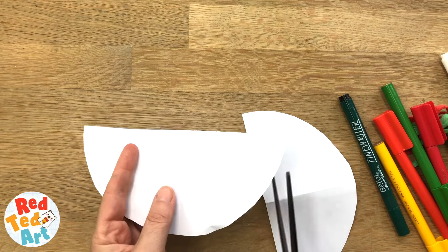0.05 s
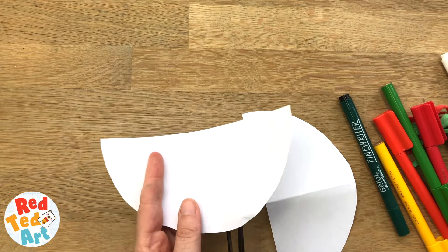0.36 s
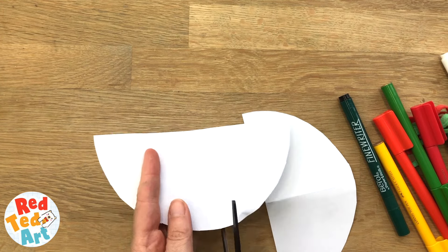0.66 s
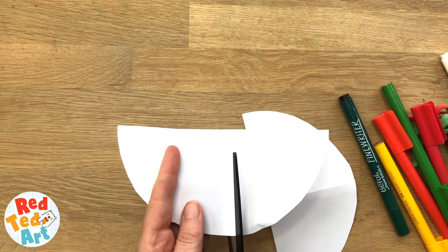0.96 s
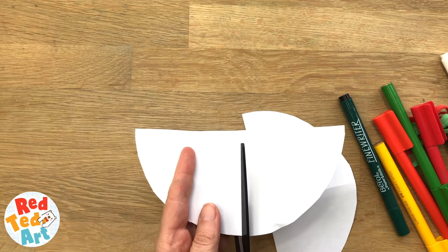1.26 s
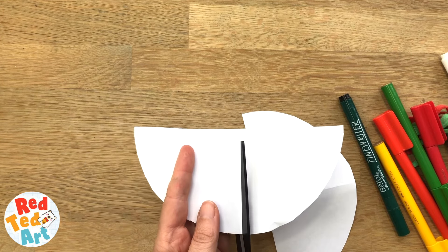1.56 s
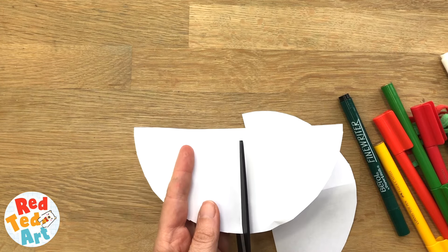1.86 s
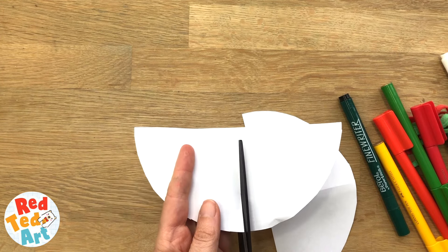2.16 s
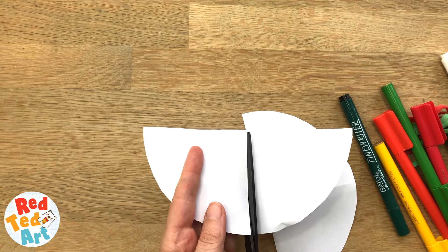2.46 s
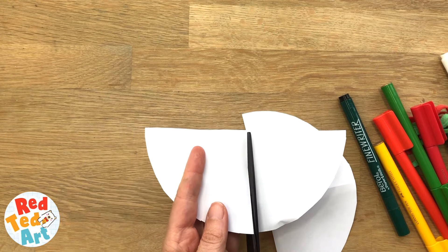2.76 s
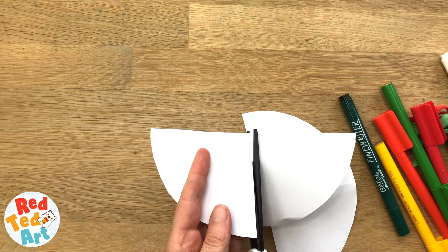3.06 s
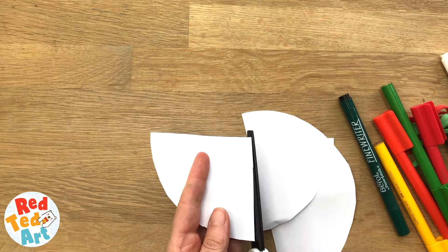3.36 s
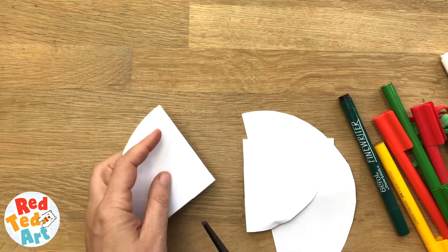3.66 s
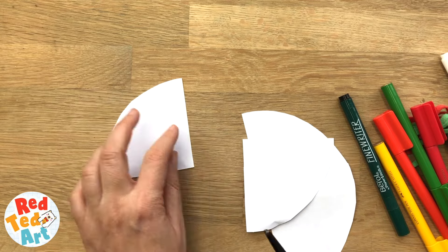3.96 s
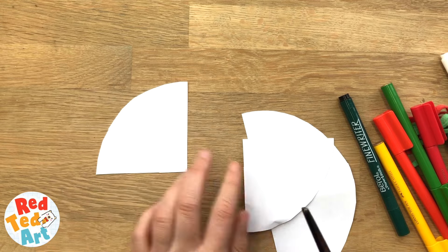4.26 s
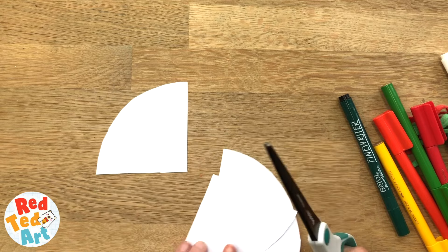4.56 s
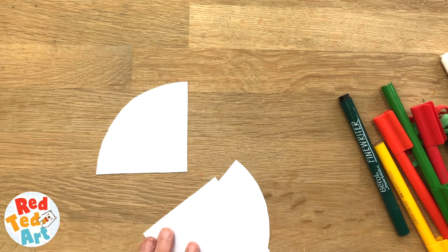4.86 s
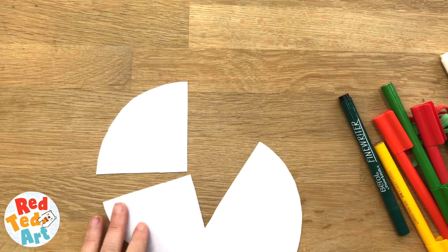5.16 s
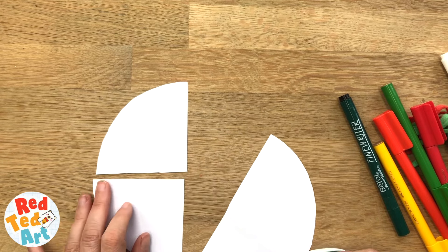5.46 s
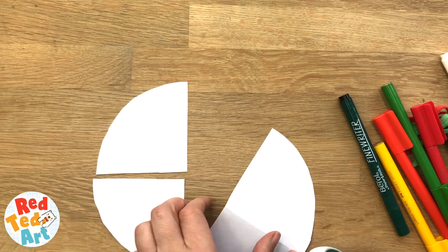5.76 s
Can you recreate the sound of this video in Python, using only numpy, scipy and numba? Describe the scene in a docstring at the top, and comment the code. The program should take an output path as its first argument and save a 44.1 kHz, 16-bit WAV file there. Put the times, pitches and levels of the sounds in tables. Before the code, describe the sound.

For the first 0.7 seconds a sheet of paper rustles and buckles with several sharp snaps, with a soft bump on a wooden table at 0.5. Around 1 second scissors begin cutting with a quiet, grainy crunch. After a short lull, slow crackling strokes follow from about 2 seconds, loudest near 2.8 and 3.3, and the blades shut with a sharp click just after 3.3. At 3.7 the paper snaps once more and a piece swishes over the wood. From about 4.5 to 5.7 come longer, bright sliding hisses, with tiny ticks of paper edges and a few soft, dull bumps. At 5.8 the scissors are put down with a knock and a slight rattle, briefly ringing the tabletop. Hands brush the wood faintly along the way. Everything is close to the microphone, over the low, steady tone of a small room.

```python
"""Scissors cut a folded paper half-circle in two, just above a wooden table in a small room; one close mic.
First the sheet rustles and buckles with sharp snaps as it is lined up. From about 1 s the blades crunch
through its fibres in a few slow strokes, clicking shut at 3.3 s. Then the pieces hiss as they slide over
the wood, and at 5.8 s the scissors are put down with a knock that rings the table top.
Hands brush the wood softly along the way, over a low, steady room tone."""
import sys
import numpy as np
from scipy import signal
from scipy.fft import rfft, irfft
from scipy.io import wavfile
from scipy.ndimage import map_coordinates
from numba import njit

SR = 44100
rng = np.random.default_rng(int(sys.argv[2]) if len(sys.argv) > 2 else 0)


def log_audio(samples):
    """Write samples as a 16-bit WAV file to the path given in sys.argv[1]."""
    # one column per channel
    frames = np.atleast_2d(samples).T
    # limit to full scale, then quantise
    limited = np.clip(frames, -1, 1)
    pcm = np.round(limited * 32767).astype(np.int16)
    wavfile.write(sys.argv[1], SR, pcm)


N = 260631
TIME = np.arange(N) / SR
HZ = np.maximum(np.arange(N // 2 + 1) * SR / N, 1)
CATCH_S = 0.0016  # onset of every hand movement

# resonances of blades and sheet: (centre [Hz], width [Hz], lift [dB])
CUT_RESONANCES = [(850, 300, -2.5), (1555, 190, 6.5), (5250, 190, -6.5), (8760, 260, 2), (14200, 1100, 0.5)]
# the sheet buckling: (time [s], pop peak [dB], crack relative to the pop [dB])
SNAPS = [(0.0531, -7, -11), (0.2099, -0.5, -4.5), (0.3289, -10, -13), (0.491, -7, -4), (0.493, -14, -0.5),
         (0.5093, -13, -15), (0.5414, -2, -18), (1.1756, -24, -16), (3.2716, -7, -15), (3.694, -10, -11)]


def cutting(flap_hz=4700, wander=0.19, flap_db=-15):
    """The crossing blades break fibre after fibre; the freed flap of paper rings at a shifting pitch."""
    # blade strokes, the last ones drawing the blades out:
    # (start [s], swell [s], hold [s], fade [s], body [dB], treble [dB])
    strokes = [(0.975, 0.085, 0.025, .1, -39.5, -40.5), (1.11, 0.035, 0.031, 0.16, -35, -37),
               (1.75, 0.3, .05, 0.023, -35.5, -36.5), (2.125, 0.018, 0.064, 0.037, -34, -34.5),
               (2.411, 0.0078, 0.14, 0.052, -31.5, -35), (2.735, 0.04, 0.041, 0.034, -25.5, -27.5),
               (2.84, 0.0056, 0.019, 0.17, -47, -42), (3.066, 0.0047, 0.0089, 0.082, -33, -34.5),
               (3.085, .06, 0.021, 0.086, -27.5, -32.5), (3.248, 0.03, 0.028, 0.042, -25, -25.5),
               (3.35, .002, 0.013, 0.073, -45, -39), (3.39, 0.047, 0.044, 0.12, -42, -43),
               (3.573, 0.012, 0.073, 0.24, -42, -40)]
    grains = fibres(per_s=7000, spread_db=0.5, clump_db=2.5, clump_hz=101)
    ring_hz = np.clip(flap_hz * np.exp(wander * drift(2)), 500, 12000)
    flap = moving_high_pass(grains, np.tan(np.pi * ring_hz / SR), damping=.1)
    return paper_friction(strokes, grains + from_db(flap_db) * flap, CUT_RESONANCES)


def crackling(rise_s=0.00097, burst_s=0.0097, fall_s=0.002):
    """The sheet crackles in short, dense bursts as it is bent or cut."""
    # runs of bursts: (time [s], bursts [count], spacing [s], body [dB], treble [dB])
    runs = [(0.085, 1, .02, -25.5, -49), (0.325, 2, .013, -23.5, -35), (1.141, 2, 0.035, -30, -33.5),
            (2.034, 1, 0.021, -30.5, -41), (2.103, 4, 0.018, -31.5, -32), (2.23, 2, 0.031, -37, -33.5),
            (2.299, 2, 0.02, -35, -33.5), (2.841, 3, 0.0125, -26, -27.5), (2.886, 1, .02, -26.5, -27.5),
            (3.069, 1, .02, -30.5, -30), (3.219, 1, .02, -34.5, -41), (3.258, 1, .011, -19.5, -18),
            (3.675, 2, .013, -22, -30.5)]
    # the crackle's two bands: (frequency [Hz], level [dB])
    body_spectrum = [(100, -19), (400, -11), (650, -3), (900, 4.5), (1500, -2.5), (2000, 1.5), (2700, -5.5),
                     (4200, -53)]
    treble_spectrum = [(1800, -79), (2800, -5), (3800, 6), (5600, 7.5), (7500, -0.5), (11000, -4.5),
                       (15000, -6)]
    body_gain, treble_gain = np.zeros((2, N))
    t = TIME[:SR // 10]
    burst = np.minimum(t / rise_s, 1) * np.exp(-np.maximum(t - burst_s, 0) / fall_s)
    for s, count, spacing, body_db, treble_db in runs:
        for k in range(round(count)):
            add(body_gain, s + k * spacing, from_db(body_db) * burst)
            add(treble_gain, s + k * spacing, from_db(treble_db) * burst)
    grains = fibres(per_s=11000, spread_db=2.5, clump_db=1.0, clump_hz=225)
    body = body_gain * colour(grains, body_spectrum, CUT_RESONANCES)
    treble = treble_gain * colour(grains, treble_spectrum, CUT_RESONANCES)
    return body + treble


def blade_clicks():
    """The blades meet at the end of the cut and rattle as the scissors land."""
    # blade on blade: (time [s], peak [dB])
    contacts = [(3.3425, -7.5), (3.3453, -2.5), (3.3464, 0.5), (5.766, -19.5), (5.7696, -19), (5.801, -29),
                (5.875, -28)]
    # modes of the blades: (frequency [Hz], level [dB], t60 [s])
    modes = [(1970, -5, 0.0027), (3390, -3.5, 0.0067), (5250, 3.5, 0.00077), (9350, -2.5, 0.00068),
             (14300, -13, 0.003)]
    return strikes(contacts, modes)


def buckling(pop_lag_s=0.00028):
    """The sheet buckles with a sharp crack, then a pop of its whole surface."""
    # modes of the sheet: (frequency [Hz], level [dB], t60 [s])
    crack_modes = [(4600, 1.3, 0.0057), (5840, 5.3, 0.0033), (7900, 5, 0.00085)]
    pop_modes = [(1010, -5, 0.0049), (1496, 4.5, 0.0026), (1920, -0.5, 0.0041), (2600, -8, 0.0033)]
    out = np.zeros(N)
    for s, pop_db, crack_db in SNAPS:
        add(out, s, from_db(pop_db + crack_db) * ring(crack_modes))
        add(out, s + pop_lag_s, from_db(pop_db) * ring(pop_modes))
    return out


def rustling(shiver_body_db=-30, shiver_treble_db=-54, shiver_fade_s=0.037):
    """Paper rubs on paper with a fine grain, and shivers after each snap."""
    # the sheet lined up and picked up again:
    # (start [s], swell [s], hold [s], fade [s], body [dB], treble [dB])
    rubs = [(0.0, 0.0011, .28, 0.27, -44.5, -42.5), (0.056, 0.0029, 0.0052, 0.058, -24.5, -48),
            (0.327, 0.034, 0.023, 0.061, -37.5, -30.5), (0.431, 0.003, 0.014, 0.042, -36, -36.5),
            (0.49, 0.017, 0.13, .04, -45, -46), (0.664, 0.0033, 0.046, 0.015, -48.5, -37.5),
            (5.79, 0.048, 0.07, .05, -55, -49)]
    shivers = [(s, CATCH_S, 0, shiver_fade_s, pop_db + shiver_body_db, pop_db + shiver_treble_db)
               for s, pop_db, _ in SNAPS]
    grains = fibres(per_s=15000, spread_db=3.5, clump_db=3.0, clump_hz=89.5)
    return paper_friction(rubs + shivers, grains)


def edge_ticks():
    """Paper edges catch with tiny, bright ticks."""
    # edges catching: (time [s], peak [dB])
    catches = [(.89, -33), (4.149, -25), (4.155, -21), (4.48, -13), (4.6823, -10), (4.7054, -8),
               (5.0409, -13)]
    # modes of an edge: (frequency [Hz], level [dB], t60 [s])
    modes = [(5370, -0.41, 0.00066), (8150, -0.58, 0.0015), (13400, -1, 0.00084)]
    return strikes(catches, modes)


def sliding(scuff_db=-21, sizzle_db=-6, sizzle_growth=0.53):
    """Paper hisses over the wood; the air gap under it gives the hiss a gliding, resonant lower edge."""
    # slides: (start [s], swell [s], hold [s], fade [s], level [dB], edge at start [Hz], after hold [Hz])
    slides = [(3.623, .014, 0.012, 0.0081, -28.5, 4950, 4460), (3.69, 0.012, .015, 0.11, -37.5, 2500, 2600),
              (3.773, 0.094, 0.027, 0.067, -32.5, 2600, 4120), (4.147, .003, 0.011, 0.075, -43, 6400, 6260),
              (4.194, 0.046, 0.0052, 0.015, -39, 6300, 6300),
              (4.474, .007, 0.016, 0.042, -28.5, 3100, 3630), (4.497, 0.021, 0.2, 0.16, -27, 4730, 4780),
              (4.826, 0.082, 0.102, 0.056, -39, 6300, 4680), (5.019, 0.11, 0.11, 0.2, -27.5, 6250, 5300),
              (5.421, 0.047, 0.038, 0.2, -41, 5900, 5000), (5.594, 0.037, 0.008, 0.08, -35, 5000, 3350)]
    # paper on wood, ahead of the air gap's filtering: (frequency [Hz], level [dB])
    hiss_spectrum = [(300, 23), (4500, -2), (7500, -3.5), (11000, -2.5), (15500, -0.5)]
    level, = movements(slides, count=1)
    glides = sorted(point for s, swell, hold, _, _, first_hz, last_hz in slides
                    for point in ((s, first_hz), (s + swell + hold, last_hz)))
    edge_hz = np.interp(TIME, *np.transpose(glides))
    step = np.tan(np.pi * np.clip(edge_hz, 500, 12000) / SR)
    grains = colour(fibres(per_s=16000, spread_db=3.0, clump_db=1.54, clump_hz=67.5), hiss_spectrum)
    resonant = moving_high_pass(grains, step, damping=.4)
    hiss = rms_one(moving_high_pass(resonant, .85 * step, damping=1.3))
    scuff = from_db(scuff_db) * noise([(100, 8), (1500, -16), (2800, 9.5), (6000, -10)])
    # the top octave grows faster than the rest when the sheet speeds up
    speed = level / level.max()
    top_octave = noise([(6000, -18.5), (10000, -2.0), (14500, -8.5)])
    sizzle = from_db(sizzle_db) * speed ** sizzle_growth * top_octave
    return level * (hiss + scuff + sizzle)


def knocks(thud_t60=0.13, thud_low_hz=75):
    """A dull thud and the low ring of the table top; a soft contact leaves out the upper modes."""
    # fingers and scissors landing: (time [s], peak [dB], low-pass [Hz], ring relative to the thud [dB])
    landings = [(.511, -21, 624, 9), (.735, -32, 1200, -11), (.836, -38, 1060, -4), (3.68, -29.5, 700, 3),
                (4.166, -37.5, 117, -14), (4.205, -40, 118, -15), (4.678, -28, 340, -1),
                (5.063, -33, 328, -2), (5.7694, -13, 1850, 12), (5.7778, -18, 685, 13),
                (5.812, -20, 400, 14), (5.875, -19, 397, 5.5)]
    # modes of the table top: (frequency [Hz], level [dB], t60 [s])
    modes = [(128, -11, 0.3), (234.7, -1.5, 0.14), (297, -5.5, 0.11), (403, -7.5, 0.062), (708, 2, 0.035),
             (795, 4.5, 0.019), (2200, 11, 0.013)]
    out, t = np.zeros(N), TIME[:SR // 3]
    for s, peak_db, soft_hz, ring_db in landings:
        burst = high_pass(dying_noise(t, thud_t60), thud_low_hz)
        thud = peak_one(low_pass(burst, soft_hz))
        wood = from_db(ring_db) * peak_one(low_pass(ring(modes), soft_hz))
        add(out, s, from_db(peak_db) * peak_one(thud + wood))
    return out


def brushing():
    """Skin and paper on wood give a soft, dull rush."""
    # sweeps over the table: (start [s], swell [s], hold [s], fade [s], level [dB])
    sweeps = [(0.0, 0.022, .7, 0.12, -47.5), (0.95, 0.24, 0.22, 1.3, -42), (1.9, 1, .2, .7, -52),
              (3.7, .12, 0.071, 0.2, -47), (4.3, 0.51, .12, 1.0, -42)]
    # the rush: (frequency [Hz], level [dB])
    spectrum = [(60, -18), (170, -1.5), (300, -3), (520, -8), (700, -4), (880, 0.5), (1200, -8),
                (2500, -16.5), (15000, -38)]
    level, = movements(sweeps, count=1)
    return level * noise(spectrum)


def table_reflection(x, delay_s=.00221, wander=0.025, strength=0.21, drift_hz=4.2):
    """The table mirrors the sheet to the mic; the gap changes as the hand moves, shifting a comb of peaks."""
    lag = delay_s * np.exp(wander * drift(drift_hz)) * SR
    return x + strength * map_coordinates(x, [np.arange(N) - lag], order=3, mode="nearest")


def room(x, near_db=-15, near_t60=0.068, far_db=-17, far_t60=0.39, wall_hz=5000, echo_hz=2400):
    """The mic hears the direct sound, then, duller, scatter off things nearby, two echoes and a faint tail."""
    # echoes off nearby surfaces: (delay [s], level [dB])
    echoes = [(.00506, -18), (.01117, -16)]
    t = TIME[:SR // 2]
    near = dying_noise(t, near_t60) * (t > .003)
    far = dying_noise(t, far_t60) * (t > .01)
    response = from_db(near_db) * near / np.linalg.norm(near) + from_db(far_db) * far / np.linalg.norm(far)
    for delay_s, level_db in echoes:
        add(response, delay_s, from_db(level_db) * low_pass(signal.unit_impulse(len(t) // 2), echo_hz))
    return x + signal.fftconvolve(x, low_pass(response, wall_hz))[:N]


def room_tone(level_db=-49.5):
    """The steady, low noise of the quiet room."""
    # the room's noise: (frequency [Hz], level [dB])
    spectrum = [(20, -46), (50, -4.5), (75, -1.5), (125, 0.5), (300, -10.5), (900, -18.5), (2000, -25),
                (10000, -31), (16000, -36)]
    return from_db(level_db) * noise(spectrum)


def paper_friction(strokes, grains, resonances=()):
    """The sheet radiates the grains as a hollow body and a crisp treble."""
    # the sheet's two bands: (frequency [Hz], level [dB])
    body_spectrum = [(100, -13.5), (400, -14.5), (650, -6), (950, 0.5), (1400, -1), (1900, 0.5),
                     (2500, -11), (4200, -55)]
    treble_spectrum = [(1800, -31), (2800, 0.5), (3800, 2), (5200, 3.5), (7000, -1.5), (10500, -6),
                       (15500, -7.5)]
    body_gain, treble_gain = movements(strokes, count=2)
    body = body_gain * colour(grains, body_spectrum, resonances)
    treble = treble_gain * colour(grains, treble_spectrum, resonances)
    return body + treble


def fibres(per_s, spread_db, clump_db, clump_hz):
    """Tiny clicks of fibres catching and breaking: uneven in size and bunched by stick and slip."""
    sizes = from_db(spread_db * np.minimum(rng.exponential(1, N), 4)) * rng.choice([-1, 1], N)
    breaks = rng.random(N) < per_s / SR
    return sizes * breaks * from_db(clump_db * drift(clump_hz))


def movement(start, swell, hold, fade, swell_db=14, fade_db=20.5):
    """Gain of one hand movement: it catches, swells, holds, then loses fade_db in each fade time."""
    t = TIME - start
    rising_db = swell_db * np.clip(1 - t / swell, 0, 1)
    falling_db = fade_db * np.clip((t - swell - hold) / fade, 0, 10)
    return np.clip(t / CATCH_S, 0, 1) * from_db(-rising_db - falling_db)


def movements(rows, count):
    """Gains of a table of movements, one for each of its level columns; overlaps add in power."""
    return np.sqrt(sum(np.outer(from_db(row[4:4 + count]), movement(*row[:4])) ** 2 for row in rows))


def strikes(blows, modes):
    """A track of timed blows on one set of modes."""
    out = np.zeros(N)
    for s, peak_db in blows:
        add(out, s, from_db(peak_db) * ring(modes))
    return out


def ring(modes):
    """One blow on a set of modes, each struck a little differently; little radiates below the lowest."""
    t = TIME[:SR // 3]
    out = sum((-1) ** k * from_db(db + rng.standard_normal() - 60 * t / t60) * np.sin(2 * np.pi * hz * t)
              for k, (hz, db, t60) in enumerate(modes))
    return peak_one(high_pass(out, 0.17 * modes[0][0]))


def colour(x, spectrum, resonances=()):
    """Filter x by a spectrum of (frequency [Hz], level [dB]) with resonant humps on it; rms 1."""
    hz, level_db = np.transpose(spectrum)
    shape_db = np.interp(np.log(HZ), np.log(hz), level_db)
    for centre, width, lift_db in resonances:
        shape_db = shape_db + lift_db / (1 + (2 * (HZ - centre) / width) ** 2)
    return rms_one(irfft(rfft(x) * from_db(shape_db), N))


def noise(spectrum):
    """Steady coloured noise; rms 1."""
    return colour(rng.standard_normal(N), spectrum)


def dying_noise(t, t60):
    """White noise that falls 60 dB in t60 seconds."""
    return rng.standard_normal(len(t)) * from_db(-60 * t / t60)


def drift(hz):
    """Smooth random wander, mostly slower than hz; rms 1."""
    return rms_one(low_pass(rng.standard_normal(N + SR), hz)[SR:])


@njit
def moving_high_pass(x, step, damping):
    """Resonant state-variable high-pass whose corner moves; step is tan(pi * corner / SR)."""
    out, band, low = np.zeros(len(x)), 0.0, 0.0
    for i in range(len(x)):
        g = step[i]
        out[i] = (x[i] - (damping + g) * band - low) / (1 + g * (g + damping))
        low += 2 * g * (band + g * out[i])
        band += 2 * g * out[i]
    return out


def low_pass(x, hz):
    """Second-order low-pass."""
    return signal.sosfilt(signal.butter(2, hz, fs=SR, output="sos"), x)


def high_pass(x, hz):
    """Second-order high-pass."""
    return signal.sosfilt(signal.butter(2, hz, "high", fs=SR, output="sos"), x)


def add(track, s, sound):
    """Mix a sound into a track at time s."""
    start = max(round(s * SR), 0)
    track[start:start + len(sound)] += sound[:N - start]


def from_db(db):
    """Decibels to gain."""
    return 10 ** (np.asarray(db) / 20)


def rms_one(x):
    """Scale to an rms of 1."""
    return x / np.sqrt(np.mean(x ** 2) + 1e-20)


def peak_one(x):
    """Scale to a peak of 1."""
    return x / np.abs(x).max()


def scene():
    """Paper and scissors above and on the table, close to the mic, over the room tone; mono."""
    in_hand = rustling() + cutting() + crackling() + buckling() + edge_ticks() + blade_clicks()
    above_table = table_reflection(in_hand)
    on_table = sliding() + knocks()
    background = room_tone()
    return (room(above_table + on_table) + brushing() + background)[None]


def record(dry, cutoff_hz=15900):
    """The recorder clips peaks beyond full scale and cuts the top steeply."""
    top_cut = signal.ellip(10, .1, 80, cutoff_hz, fs=SR, output="sos")
    return signal.sosfilt(top_cut, np.clip(dry, -1, 1))


dry = scene()
out = record(dry)
log_audio(out)
```